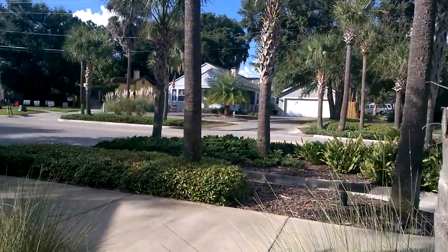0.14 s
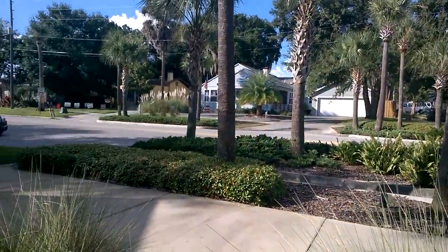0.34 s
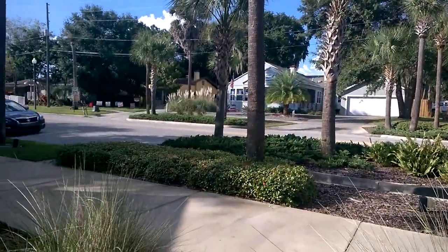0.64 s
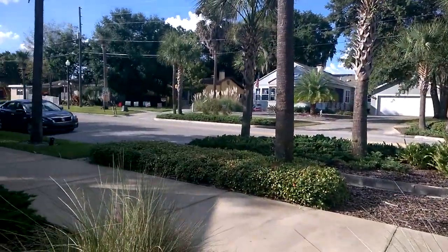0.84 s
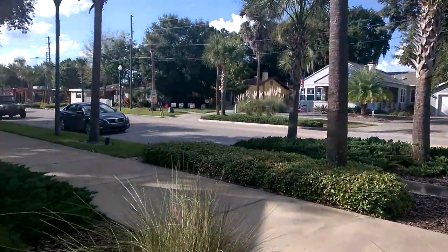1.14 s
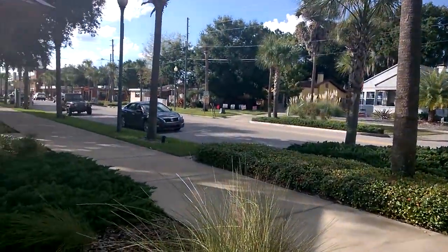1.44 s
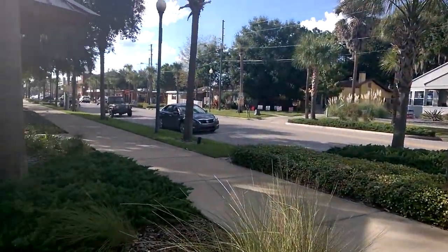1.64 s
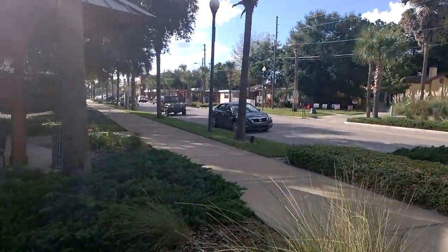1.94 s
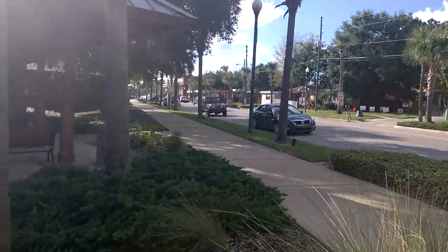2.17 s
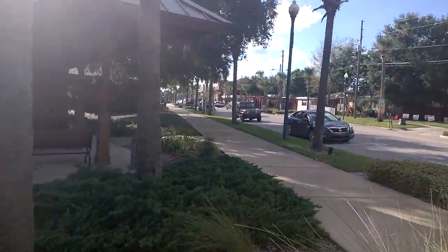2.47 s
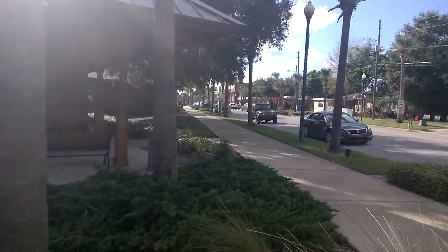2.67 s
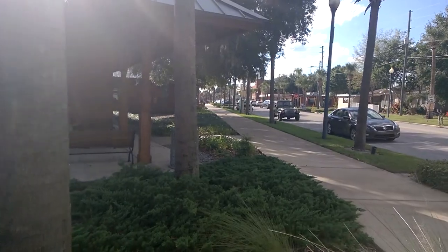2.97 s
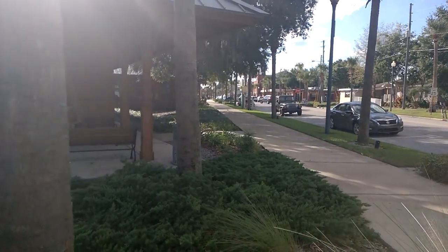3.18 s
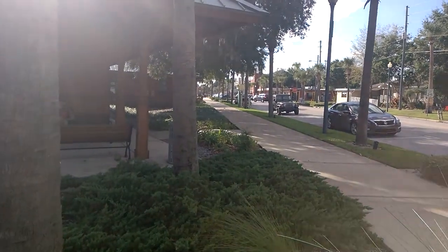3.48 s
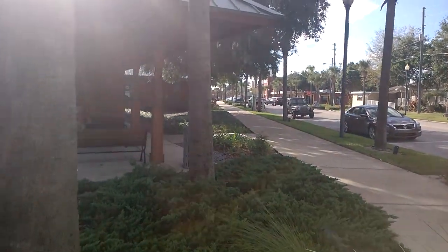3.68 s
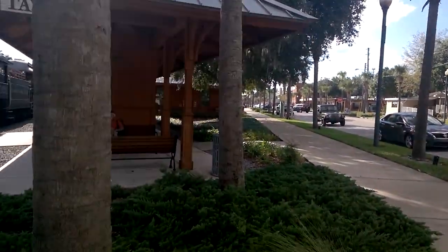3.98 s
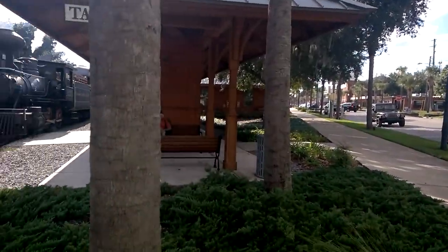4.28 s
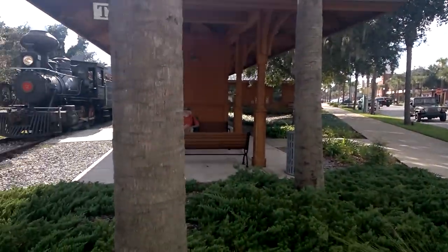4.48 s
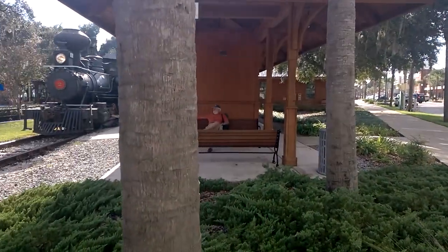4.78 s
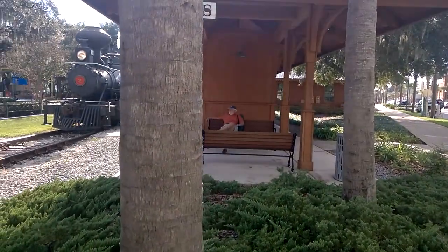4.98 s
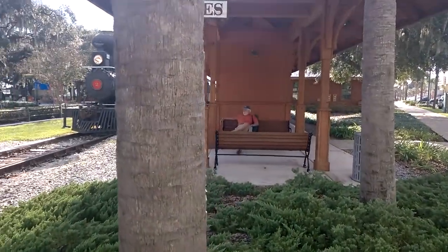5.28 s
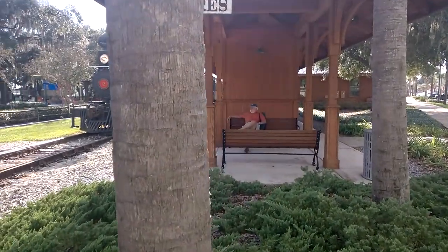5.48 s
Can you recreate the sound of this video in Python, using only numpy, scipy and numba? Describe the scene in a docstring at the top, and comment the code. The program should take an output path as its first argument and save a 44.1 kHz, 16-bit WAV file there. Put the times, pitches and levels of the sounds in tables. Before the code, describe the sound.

From the start, leaking steam from a standing locomotive makes a bright, sizzling hiss with a very thin high edge. It never stops, but flutters and shifts colour as one microphone is carried past trunks and posts, whose short reflections comb it. Beneath lie a soft low fire rumble with brief surges, a faint wavering generator hum and a barely audible far street. At about 0.8 s a loud ragged exhaust puff bursts from the stack, ringing like a pipe, its squeal dropping in pitch as it fades over a few tenths of a second. At 2.3 s a second puff comes, with two steadier squeals, and cuts off sharply by about 2.6 s. Dull, faint station echoes follow each. From 3 to 4 s the hiss has narrow sizzling bands; after 4.4 s its lower body thins and its bands sink, while rumble and hum grow slightly, with a strong fire surge near 5.35 s.

```python
"""Leaking steam hisses all along from a locomotive standing at a small outdoor station: coloured noise,
combed by short moving reflections as one microphone is carried past palm trunks.
Twice a puff of exhaust noise blows up the stack, rings its pipe modes and squeals.
Beneath lie the fire's surging low noise, a generator's beating sines and the faint noise of a far street."""
import sys
import numpy as np
from scipy import signal
from scipy.fft import rfft, irfft
from scipy.io import wavfile
from scipy.ndimage import uniform_filter1d, map_coordinates
from numba import njit

SR = 44100
rng = np.random.default_rng(int(sys.argv[2]) if len(sys.argv) > 2 else 0)


def inscribe(sig):
    """Save sig as 16-bit PCM at rate SR to the path in sys.argv[1].

    A 1-D sig is mono; a 2-D sig holds one channel per row.
    Samples are clipped to [-1, 1] before scaling.
    """
    pcm = np.round(np.clip(np.atleast_2d(sig).T, -1, 1) * 32767)
    wavfile.write(sys.argv[1], SR, pcm.astype(np.int16))


N = 247842
TIME = np.arange(N) / SR   # s
BINS = np.maximum(np.fft.rfftfreq(N, 1 / SR), 1)   # Hz


def from_db(db):
    """Decibels to gain."""
    return 10 ** (np.asarray(db) / 20)


def rms_one(x):
    """Scale to unit power."""
    return x / np.sqrt(np.mean(x ** 2) + 1e-20)


def held(x, size):
    """Even out a noise's power over a number of samples."""
    return x / np.sqrt(uniform_filter1d(x ** 2, size=size) + 1e-9)


def in_time(rows):
    """Each column of a curve, at every sample."""
    seconds, *columns = np.transpose(rows)
    return [np.interp(TIME, seconds, column) for column in columns]


def noise(spectrum, window=1):
    """Steady noise of a given colour, rms 1."""
    hz, db = np.transpose(spectrum)
    gain = from_db(np.interp(np.log(BINS), np.log(hz), db)) * window
    return rms_one(irfft(rfft(rng.standard_normal(N)) * gain, N))


def drift(rate_hz):
    """Slow chance with rms 1, made of noise mostly below a rate."""
    return rms_one(irfft(rfft(rng.standard_normal(N)) / (1 + (BINS / rate_hz) ** 2), N))


@njit
def resonate(x, hz, width):
    """A resonance whose centre and width may move; unit white noise comes out at about rms 1."""
    out, state = np.zeros(len(x)), 0j
    for i in range(len(x)):
        r = np.exp(-np.pi * width[i] / SR)
        turned = state * r * np.exp(2j * np.pi * hz[i] / SR)
        state = turned + x[i] * np.sqrt(2 * (1 - r * r))
        out[i] = state.real
    return out


def whistle(hz, width_hz):
    """Turbulence twice through a resonance that may move, evened to about rms 1."""
    hz = hz * np.ones(N)
    skirt = np.abs(width_hz) * 1.61 * np.ones(N)   # wider, since two passes narrow the band
    once = resonate(rng.standard_normal(N), hz, skirt)
    return held(resonate(once, hz, skirt), size=1800)


def delayed(x, ms):
    """Read a sound a fixed or moving number of milliseconds late."""
    return map_coordinates(x, [np.arange(N) - ms * SR / 1000], order=3, mode="mirror")


# colour shared by the far street and the fire: f/Hz, density/(dB per Hz)
RUMBLE_COLOUR = [(20, -25), (38, -6), (54, 0.5), (75, -9.5), (105, -8), (135, -17), (225, -14),
                 (300, -23.5), (420, -21.5), (490, -16), (600, -24), (1000, -19.5), (1500, -22.5),
                 (2200, -38)]
RUMBLE_SPLIT_HZ = 160   # the fire lies below, the street above
STREET_DB, STREET_RISE_DB_PER_S = -54, .5   # level at the start; it grows as the microphone turns


def street():
    """The distant street is a bed of noise whose level wavers and slowly grows."""
    bed = noise(RUMBLE_COLOUR, BINS >= RUMBLE_SPLIT_HZ)
    return from_db(STREET_DB + STREET_RISE_DB_PER_S * TIME + 1.0 * drift(21)) * bed


HUM_HZ = 95.9   # centre of a wandering pitch
HUM_DB, HUM_RISE_DB_PER_S = -51, 0.72   # level at the start; it grows as the microphone turns


def generator(waver_db=-0.1, wander=0.0068, beat_hz=4.3, beat_db=-13):
    """The generator hums on a wandering sine, its octave and a weaker sine that beats with it."""
    turn = 2 * np.pi * np.cumsum(HUM_HZ * (1 + wander * drift(3.6))) / SR
    octave = from_db(-22.5) * np.sin(2 * turn)
    beating = from_db(beat_db) * np.sin(turn + 2 * np.pi * beat_hz * TIME)
    level_db = HUM_DB + HUM_RISE_DB_PER_S * TIME + waver_db * drift(4.6)
    return rms_one(np.sin(turn) + octave + beating) * from_db(level_db)


FIRE_DB, FIRE_FLICKER_DB, SURGE_S = -47.5, 1.9, 0.042   # resting level, flicker rms, surge half length to 1/e
# surges of the fire: t/s, lift/dB
FIRE_SURGES = [(.18, 2), (1.08, 6), (1.95, 7.5), (3.17, 8.5), (4.08, 4), (4.76, 5), (5.04, 4.5),
               (5.35, 9.5)]


def fire():
    """The fire rumbles as low noise that flickers in level and swells in short surges."""
    surge_db = sum(db * np.exp(-((TIME - s) / SURGE_S) ** 2) for s, db in FIRE_SURGES)
    rumble = held(noise(RUMBLE_COLOUR, BINS < RUMBLE_SPLIT_HZ), size=7000)
    return from_db(FIRE_DB + surge_db + FIRE_FLICKER_DB * drift(4)) * rumble


def station(x, wall_db=-21, count=4):
    """The platform roof and walls return a few dull echoes."""
    dull = signal.sosfilt(signal.butter(1, 3500, fs=SR, output="sos"), x)
    return x + from_db(wall_db) * sum(delayed(dull, ms) for ms in rng.uniform(20, 90, count))


HOLD_S, SAG_DB_PER_S = 0.094, 36.5   # end of full pressure after the start, then its slow fall


def blast(start, attack_s, open_s, release_db_per_s, sag_db_per_s):
    """Steam flow through the valve: it rises, holds, sags with the pressure and dies when the valve shuts."""
    age = TIME - start
    sag_db = sag_db_per_s * np.maximum(age - HOLD_S, 0)
    release_db = release_db_per_s * np.maximum(age - open_s, 0)
    return np.clip(age / attack_s, 0, 1) * from_db(-(sag_db + release_db))


SQUEAL_FALL_S, SQUEAL_SAG_DB_PER_S = 0.031, 67   # pitch drops and level fades as the pressure gives way


def squeal(start, attack_s, length_s, release_db_per_s, hz, fall_hz, width_hz, db):
    """An edge tone of the exhaust; its pitch steps down as the pressure starts to sag."""
    fallen = (1 + np.tanh((TIME - start - HOLD_S) / SQUEAL_FALL_S)) / 2
    flow = blast(start, attack_s, length_s, release_db_per_s, SQUEAL_SAG_DB_PER_S)
    return from_db(db) * flow * whistle(hz - fall_hz * fallen, width_hz)


TREBLE_HZ, TREBLE_SAG_DB_PER_S = 3380, 45   # the treble of a puff fades faster by this much
# pipe modes of the stack: f/Hz, width/Hz, lift/dB
STACK_MODES = [(62, 8, 11), (243, 7, 14), (378, 9, 10), (411, 7, 6), (686, 7, 14), (850, 18, 5),
               (986, 18, 8), (1245, 24, 3), (1616, 12, 6), (1695, 14, 7), (1762, 12, 7), (1831, 10, 6),
               (1859, 10, 9), (2661, 10, 8), (2714, 14, 7), (2847, 16, 6), (3173, 14, 6)]


def puff(start, attack_s, open_s, release_db_per_s, level_db, colour, rough_db=-1.0):
    """A ragged burst of steam that dulls as it sags, lifted at the stack's modes."""
    valve = (start, attack_s, open_s, release_db_per_s)
    rush = noise(colour)
    body = irfft(rfft(rush) / (1 + (BINS / TREBLE_HZ) ** 8), N)
    flow = body * blast(*valve, SAG_DB_PER_S)
    flow += (rush - body) * blast(*valve, SAG_DB_PER_S + TREBLE_SAG_DB_PER_S)
    steam = from_db(level_db + rough_db * drift(70)) * flow + 1e-18   # tiny offset keeps the filters off zero
    ringing = 0
    for hz, width_hz, lift_db in STACK_MODES:
        mode = signal.iirpeak(hz, hz / width_hz, fs=SR)
        ringing = ringing + (from_db(lift_db) - 1) * signal.lfilter(*mode, steam)
    return steam + ringing


# puffs before the exhaust trim: start t/s, attack/s, valve open/s, release/(dB per s), level/dB
EXHAUST_PUFFS = [(0.779, 0.063, .24, 90, -26), (2.306, 0.043, .28, 260, -25.5)]
# colour of each puff before the stack: f/Hz, density/(dB per Hz)
FIRST_PUFF_COLOUR = [(30, 1), (60, 4.5), (170, 0.5), (245, -6.5), (310, -4), (420, -2), (600, -7),
                     (1050, -4), (1600, -1.5), (2300, 4.5), (3300, 0), (3700, 1.5), (4800, 1), (6500, -10),
                     (16000, -14)]
SECOND_PUFF_COLOUR = [(30, -1), (60, 8), (170, -3), (300, -6.5), (450, -5.5), (720, -11.5), (900, -3.5),
                      (1250, -1), (1650, 2.5), (2200, -2), (3100, 4.5), (3650, -1), (4250, 0), (5500, -9),
                      (16000, -19)]
# edge tones before the trim:
# start t/s, attack/s, length/s, release/(dB per s), f/Hz, fall/Hz, width/Hz, level/dB
EDGE_TONES = [(.785, 0.038, 0.42, 18, 2770, 360, 180, -28), (2.3, 0.13, 0.22, 260, 1865, 31, 46, -26.5),
              (2.315, 0.047, 0.19, 260, 2790, 20, 120, -27.5)]


def exhaust(trim_db=-1.35):
    """Two puffs and their edge tones leave the stack and echo around the station."""
    colours = [FIRST_PUFF_COLOUR, SECOND_PUFF_COLOUR]
    blown = sum(puff(*row, colour) for row, colour in zip(EXHAUST_PUFFS, colours))
    blown += sum(squeal(*row) for row in EDGE_TONES)
    return from_db(trim_db) * station(blown)


def scatter(x, count=12):
    """Posts, rails and ground add faint echoes that creep with the microphone and grain the hiss."""
    strength, creep_ms = .075, .04
    delays_ms = rng.uniform(1.48, 13, count)
    return x + strength * sum(delayed(x, ms + creep_ms * drift(0.33)) for ms in delays_ms)


# treble reflection from a near trunk: t/s, delay/ms, strength (inverted below 0)
NEAR_TRUNK = [(0.0, 0.32, 0.0025), (0.933, 0.37, 0.107), (1.439, 0.46, -0.095), (2.241, 0.54, -0.041),
              (2.635, 0.41, 0.073), (2.856, 0.48, 0.16), (3.327, 0.43, 0.088), (3.595, 0.425, 0.071),
              (4.075, 0.59, 0.22), (4.483, 0.71, 0.018), (4.671, 0.51, 0.031), (5.62, 0.81, 0.063)]
# full reflection from a farther surface: t/s, delay/ms, strength
FAR_SURFACE = [(0.0, 0.81, 0.077), (1.22, 0.92, 0.13), (1.625, 0.9, 0.094), (2.26, 1, 0.089),
               (2.782, 0.74, 0.037), (3.54, 0.63, 0.045), (4.053, 0.79, 0.082), (4.251, 0.93, 0.2),
               (5.62, 1, 0.023)]


def reflections(x, trunk_spread_ms=0.029):
    """Short echoes comb the hiss; a narrow trunk throws back only the treble."""
    near_ms, near = in_time(NEAR_TRUNK)
    far_ms, far = in_time(FAR_SURFACE)
    # subtracting two close arrivals cancels the bass
    treble = delayed(x, near_ms - trunk_spread_ms) - delayed(x, near_ms + trunk_spread_ms)
    return x + near * treble + far * delayed(x, far_ms)


# narrow sizzle of the leak: t/s, centre f/Hz, width/Hz, level/dB
LEAK_SIZZLE = [(0, 9400, 900, -45.5), (.5, 9250, 800, -43.5), (1.28, 9500, 900, -43),
               (1.42, 10200, 1500, -38), (1.66, 10200, 1900, -36), (1.8, 9800, 1000, -48),
               (1.97, 9600, 750, -41), (2.27, 9360, 700, -38.5), (2.5, 9100, 800, -55),
               (2.68, 9500, 700, -37.5), (2.93, 9600, 657, -34), (3.55, 9720, 570, -36.5),
               (3.8, 9250, 750, -38.5), (3.9, 9680, 550, -36), (4.12, 9350, 750, -40),
               (4.34, 9440, 620, -37), (4.62, 9800, 850, -41), (5.62, 9400, 750, -42.5)]


def sizzle():
    """A narrow band of the jet's turbulence whose centre, width and level move."""
    hz, width_hz, db = in_time(LEAK_SIZZLE)
    return from_db(db) * whistle(hz, width_hz)


# crests that sink overall as the microphone moves, one table each: t/s, centre f/Hz, level/dB
HISS_CRESTS = [
    [(0, 5520, -45), (1.24, 5030, -40.5), (1.76, 4000, -40), (2.17, 3600, -40.5), (2.75, 3130, -42.5),
     (3.4, 3250, -37.5), (3.95, 2490, -45), (4.35, 2450, -40.5), (4.85, 1930, -51.5), (5.62, 1860, -50.5)],
    [(0, 5900, -54), (1.25, 6000, -44), (1.65, 5180, -46), (2.2, 5220, -49), (2.6, 4700, -60),
     (3.3, 4850, -45.5), (3.65, 4650, -48.5), (3.87, 4250, -45.5), (4.3, 3400, -52), (5.62, 3270, -54.5)],
    [(2.7, 7600, -59), (3.15, 8100, -44), (3.6, 8200, -54), (4.12, 8300, -39.5), (4.36, 8050, -44.5),
     (4.6, 6570, -45), (5.62, 6140, -51.5)],
    [(3.9, 5200, -75), (4.25, 4670, -47), (4.62, 4470, -47.5), (4.85, 4400, -75)],
]
# width of each crest: width/Hz
HISS_CREST_WIDTHS = [570, 290, 600, 380]


def crests():
    """Moving bands of noise stand out of the hiss."""
    total = np.zeros(N)
    for rows, width_hz in zip(HISS_CRESTS, HISS_CREST_WIDTHS):
        hz, db = in_time(rows)
        total += from_db(db) * whistle(hz, width_hz)
    return total


# colour of the steam leak: f/Hz, density/(dB per Hz)
LEAK_COLOUR = [(300, -19), (700, -31), (1100, -15), (1550, -7), (1950, -1.5), (2500, 2.5), (3200, -1.5),
               (3800, -2), (6000, -1), (7000, -4), (8800, -2), (10700, -1.5), (12500, -10), (16000, -7.5)]
# register levels before trim, shifting as the microphone turns and passes trunks:
# t/s, rush level/dB, hiss level/dB, spray level/dB, top level/dB
LEAK_EXPOSURE = [(0, -40.5, -32.5, -38, -31), (.4, -41, -35, -36.5, -31), (.9, -39, -36, -37.5, -31.5),
                 (1.23, -37, -40, -39, -44.5), (1.68, -38, -37, -35, -32.5), (1.99, -36.5, -37, -41.5, -40),
                 (2.24, -36.5, -38.5, -42.5, -41.5), (2.51, -34, -38, -33.5, -41),
                 (2.73, -37, -40, -38.5, -42), (3.51, -38, -42, -36.5, -42),
                 (3.85, -38.5, -39.5, -38, -33.5), (4.05, -40.5, -40.5, -36.5, -44),
                 (4.42, -46, -39, -35.5, -41), (4.78, -45, -43.5, -37.5, -42.5),
                 (5.62, -43.5, -43, -37, -45.5)]
# borders between the four registers: f/Hz
REGISTER_BORDERS = [3560, 6650, 12350]
WHISTLE_HZ, WHISTLE_WIDTH_HZ, WHISTLE_DB = 12450, 250, -14.5   # level relative to the untrimmed top register


def leak(flutter_db=0.39, patchy_db=0.79, register_trim_db=-1.81):
    """A jet in four overlapping registers, with sizzle, crests and a thin whistle, flutters in level."""
    registers_db = in_time(LEAK_EXPOSURE)
    jet = sizzle() + crests()
    jet += from_db(registers_db[-1] + WHISTLE_DB) * whistle(WHISTLE_HZ, WHISTLE_WIDTH_HZ)
    # power share below each border; neighbours differ by one register
    below = [0] + [1 / (1 + (BINS / hz) ** 16) for hz in REGISTER_BORDERS] + [1]
    for low, high, db in zip(below, below[1:], registers_db):
        band = noise(LEAK_COLOUR, np.sqrt(np.abs(high - low)))
        jet += from_db(db + register_trim_db + patchy_db * drift(6.0)) * band
    return jet * from_db(flutter_db * drift(9.2))


def scene():
    """Everything reaches one microphone, the same in both channels."""
    background = street() + generator() + fire()
    mono = background + exhaust() + scatter(reflections(leak()))
    return np.array([mono, mono])


def record(dry, cutoff_hz=15680):
    """The top is cut steeply by an elliptic low-pass."""
    return signal.sosfilt(signal.ellip(12, .1, 85, cutoff_hz, fs=SR, output="sos"), dry)


dry = scene()
out = record(dry)
inscribe(out)
```